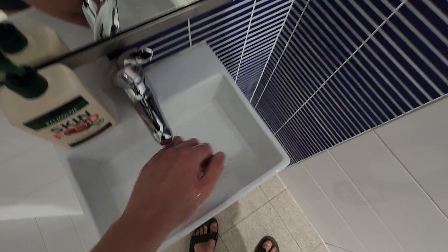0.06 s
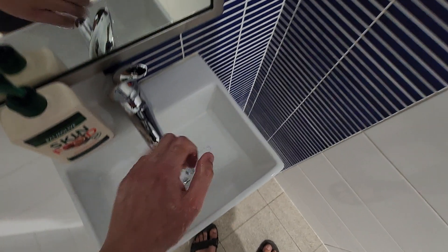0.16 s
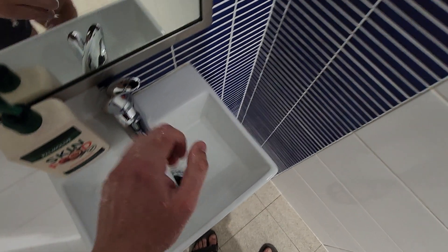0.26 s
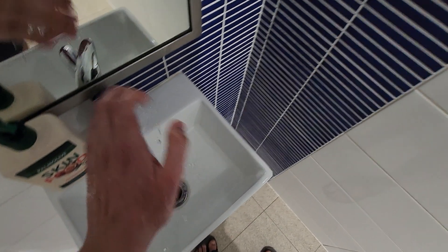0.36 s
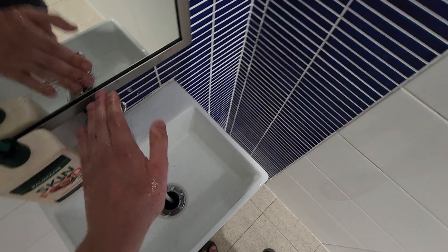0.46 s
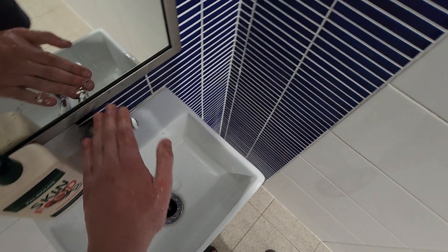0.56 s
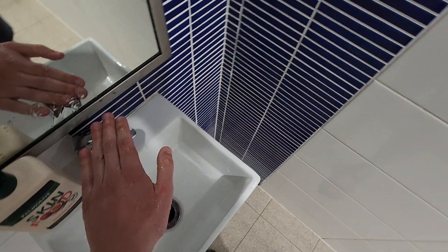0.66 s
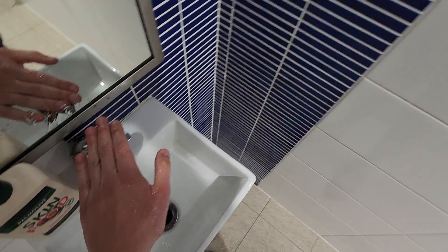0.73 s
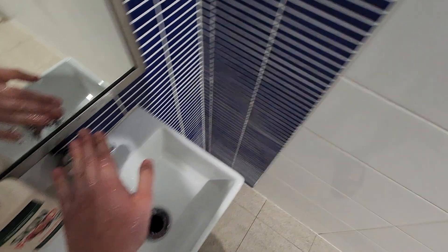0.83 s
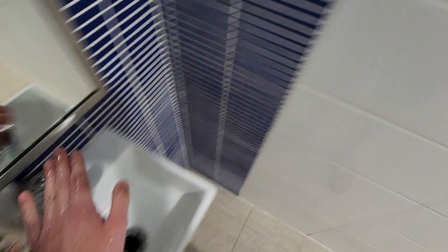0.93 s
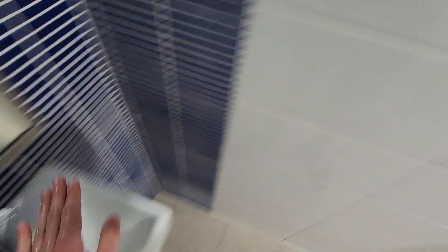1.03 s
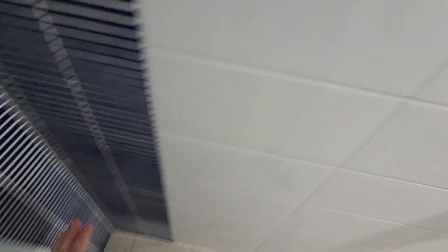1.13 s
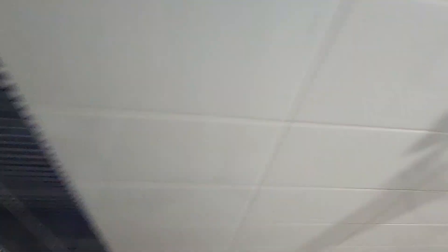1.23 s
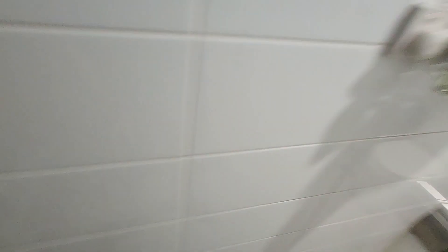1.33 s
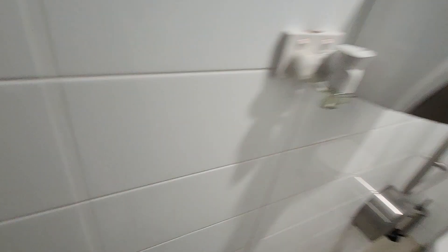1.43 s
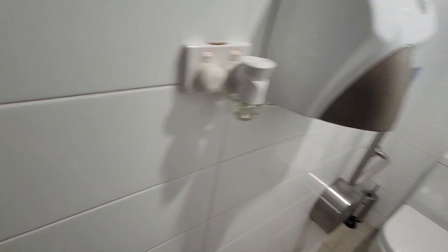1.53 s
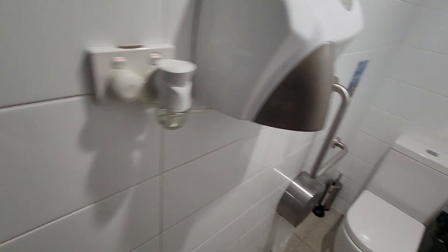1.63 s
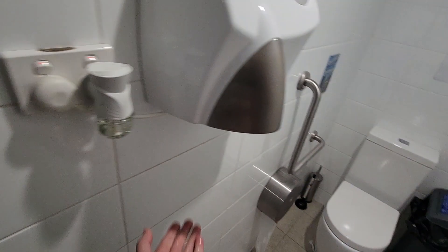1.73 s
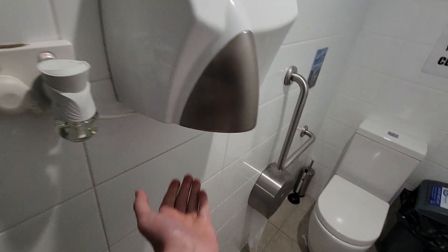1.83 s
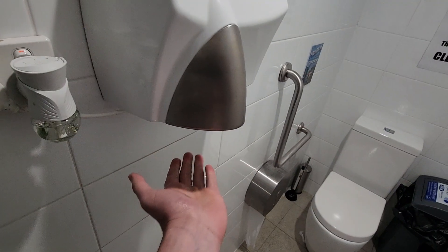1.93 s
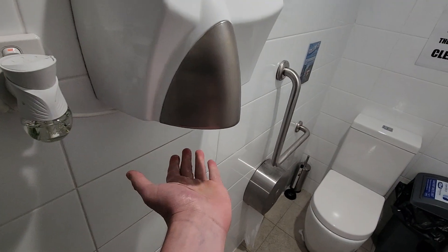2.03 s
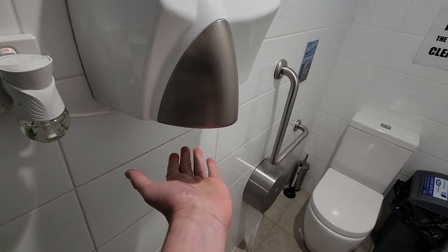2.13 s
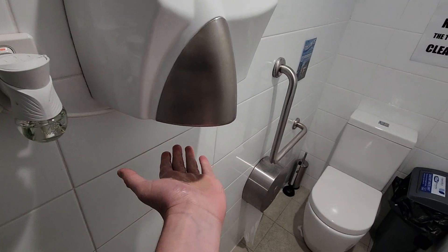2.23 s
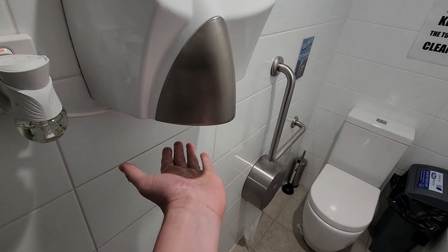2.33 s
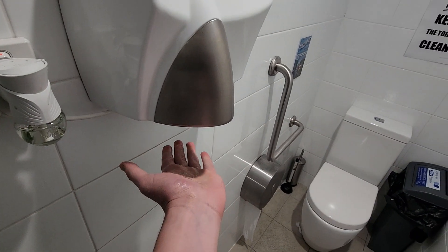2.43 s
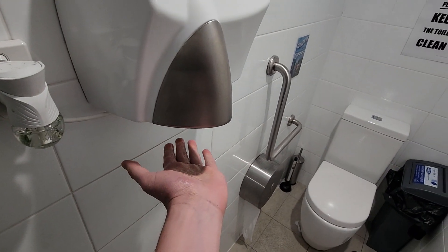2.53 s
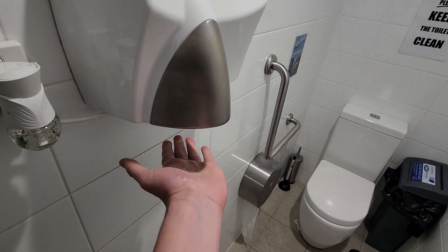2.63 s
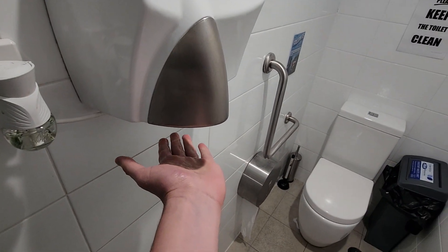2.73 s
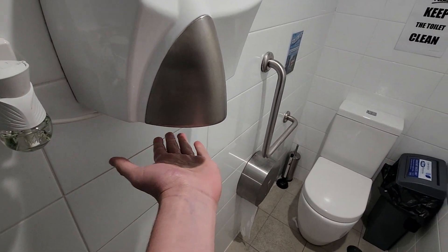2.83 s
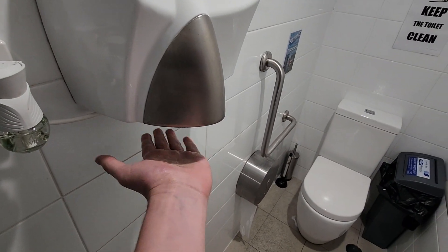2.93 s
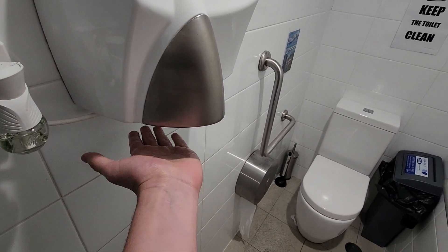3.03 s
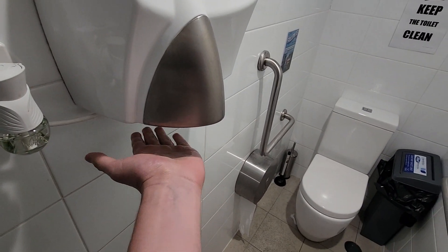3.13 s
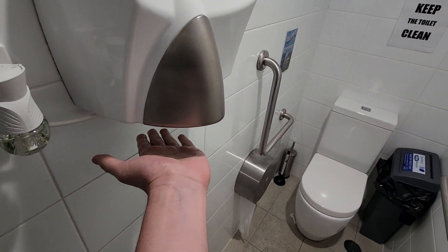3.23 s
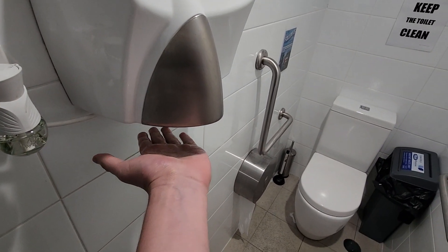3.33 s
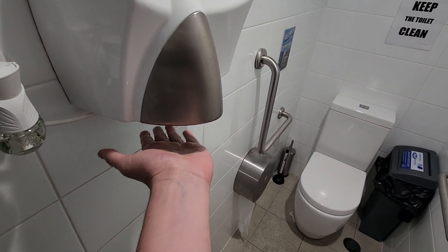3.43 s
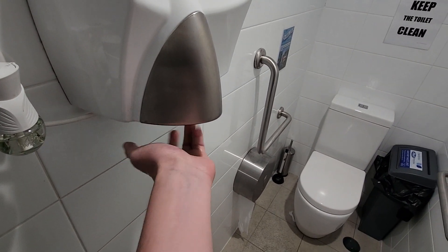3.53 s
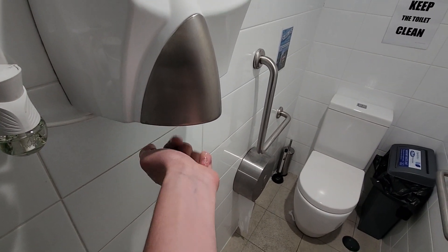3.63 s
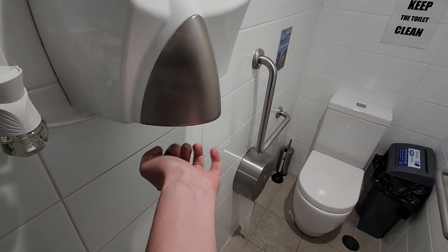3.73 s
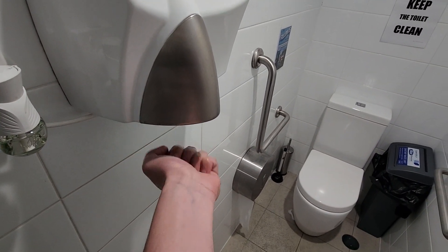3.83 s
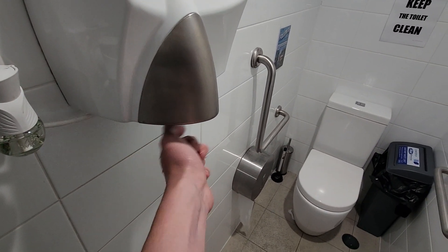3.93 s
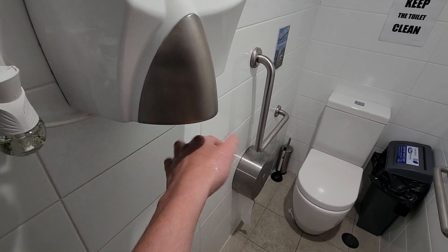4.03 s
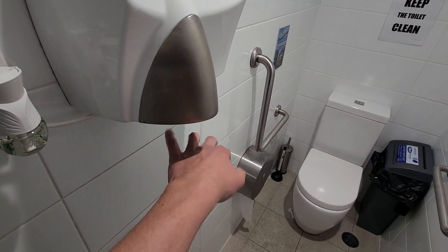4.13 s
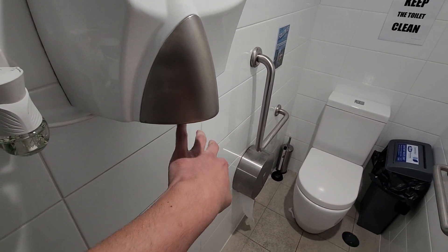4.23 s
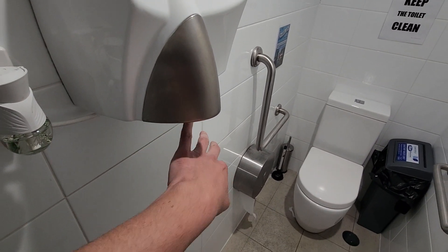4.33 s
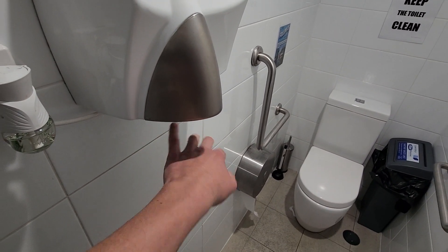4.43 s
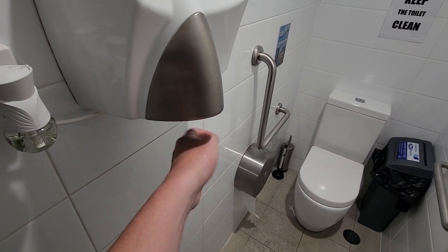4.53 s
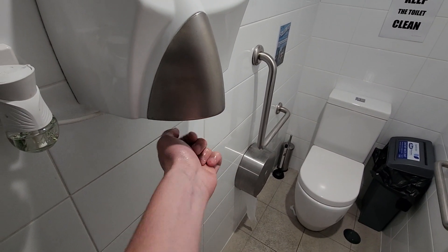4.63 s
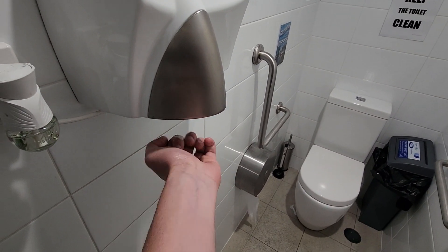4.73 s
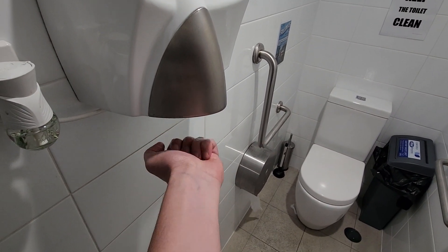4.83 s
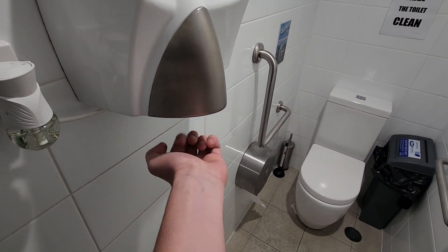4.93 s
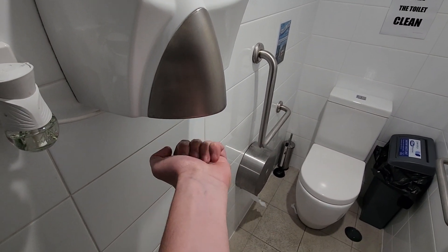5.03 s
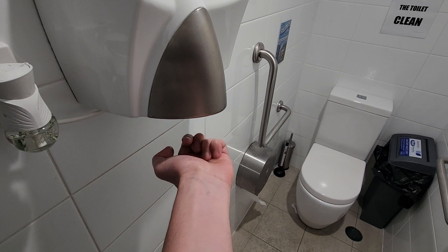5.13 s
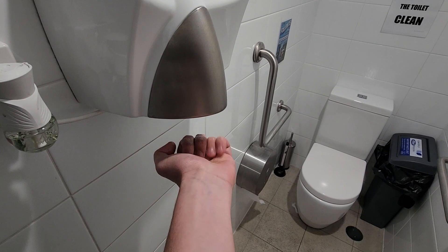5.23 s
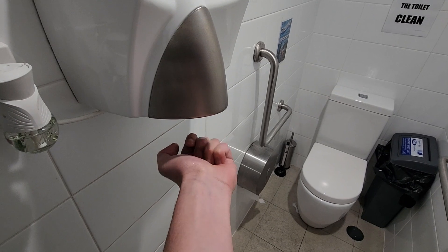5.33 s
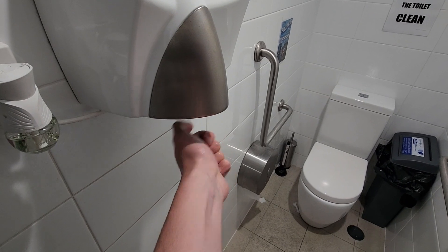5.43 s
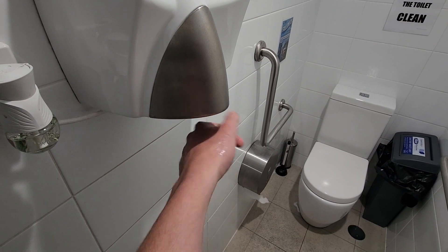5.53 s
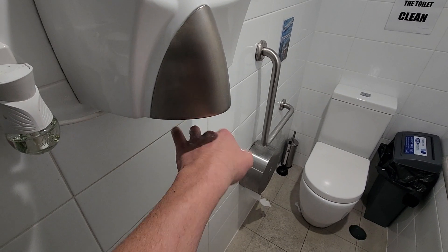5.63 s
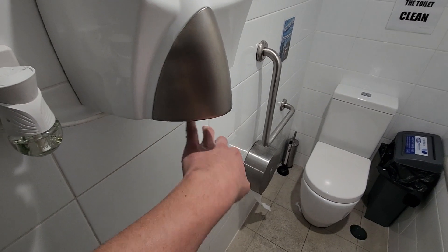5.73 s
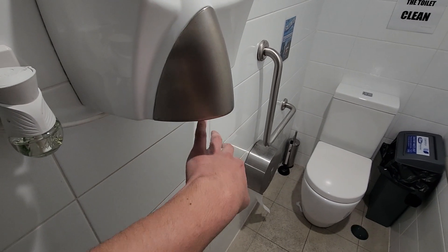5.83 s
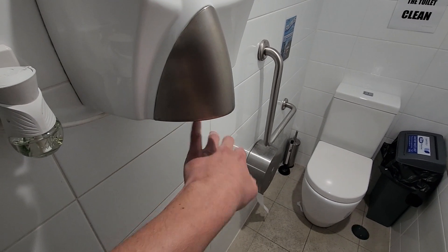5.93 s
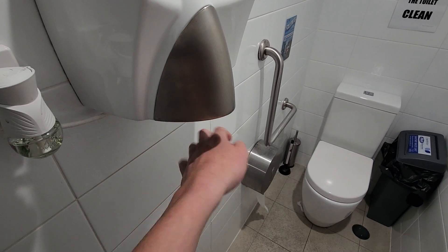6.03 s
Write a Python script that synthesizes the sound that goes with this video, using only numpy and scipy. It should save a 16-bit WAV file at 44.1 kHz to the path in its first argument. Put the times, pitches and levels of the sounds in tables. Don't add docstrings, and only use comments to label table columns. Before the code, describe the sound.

A small, hard tiled toilet room heard close up in stereo. From 0 to 1 s a tap splashes into a basin, fullest near 0.2 s, then throttled: sharp drops patter, the valve sings and the pipe gurgles in short bursts, with soft low thuds, until the water stops. From 1 to 2 s a few drops tick and rubber soles scuff and drag on tile, settling with a step at 2 s. Ventilation rumbles low throughout, with a thin whine emerging; it is quiet from 2.3 s, with tiny ticks and a faint step near 3.1 s. At 3.15 s a relay snaps brightly, the motor jolts with a thump and a short rising whine, and within about half a second a loud rush of air fills the room. The boomy, hissing roar over a low motor hum continues to about 6.1 s, dipping slightly near 3.85 and 4.9 s and swelling at the end as a hand moves.

```python
import sys
import numpy as np
from scipy import signal
from scipy.fft import rfft, irfft, next_fast_len
from scipy.io import wavfile
from scipy.ndimage import uniform_filter1d, map_coordinates

SR = 44100
rng = np.random.default_rng(int(sys.argv[2]) if len(sys.argv) > 2 else 0)


def wrap_up_sound(samples):
    columns = np.atleast_2d(samples).T
    tamed = np.clip(columns, -1, 1)
    steps = np.round(tamed * 32767).astype(np.int16)
    wavfile.write(sys.argv[1], SR, steps)


def gain_from_db(level_db):
    decades = np.asarray(level_db, float) / 20
    return 10 ** decades


N = 268128
TIME = np.arange(N) / SR
SIZE = next_fast_len(N + SR // 2)
HZ = np.maximum(np.arange(SIZE // 2 + 1) * SR / SIZE, 1)
RELAY_S = 3.1525
SINCE = np.maximum(TIME - RELAY_S, 0)
TAP_SHUT_S = 1.0


def rms_one(x):
    return x / np.sqrt(np.mean(x ** 2) + 1e-20)


def in_time(rows):
    s, *columns = np.transpose(rows)
    return [np.interp(TIME, s, c) for c in columns]


def in_pitch(rows):
    hz, *columns = np.transpose(rows)
    return [np.interp(np.log(HZ), np.log(hz), c) for c in columns]


def ramp(start_s, length_s):
    return np.clip((TIME - start_s) / length_s, 0, 1)


def bump(x, centre, half_width):
    return np.exp(-((x - centre) / half_width) ** 2)


def tone(hz):
    return np.sin(2 * np.pi * np.cumsum(hz) / SR)


def peaks(modes):
    return sum(gain_from_db(db) ** 2 / (1 + (2 * (HZ - hz) / width) ** 2) for hz, width, db in modes)


def below(hz):
    return 1 / (1 + (HZ / hz) ** 8)


def drift(rate):
    steps = rng.standard_normal(400)
    return rms_one(map_coordinates(steps, [np.minimum(TIME * rate + 2, 390)], order=3))


def ring(clicks, hz, t60):
    r = gain_from_db(-60 / (t60 * SR))
    w = 2 * np.pi * hz / SR
    return signal.lfilter([0, np.sin(w)], [1, -2 * r * np.cos(w), r * r], clicks)


def sides(db):
    return gain_from_db(np.multiply.outer([.5, -.5], np.atleast_1d(db)))


# (frequency [Hz], likeness [-1 to 1], left lead [rad])
DISTANT_PORTS = [(173, 0.98, 0), (300, 0.67, 0), (446, 0.67, 0), (620, 0.17, 0), (710, 0.43, 0),
                 (970, -0.034, 0), (1000, -0.56, 0), (1500, -0.059, 0.0033), (2080, 0.079, 0),
                 (16000, -0.084, 0)]


def field(gain, ports=DISTANT_PORTS, source=None):
    if source is None:
        source = rng.standard_normal((2, N))
    left, other = rfft(source, SIZE)
    alike, lead = in_pitch(ports)
    alike = np.clip(alike, -1, 1)
    right = alike * np.exp(-1j * lead) * left + np.sqrt(1 - alike ** 2) * other
    return rms_one(irfft(gain * np.array([left, right]), SIZE)[:, :N])


def two_tone(gain, body, top, source=None):
    low = below(10000)
    return (body * field(gain * np.sqrt(low), source=source)
            + top * field(gain * np.sqrt(1 - low), source=source))


def evened(x, span_s):
    return x / np.sqrt(uniform_filter1d(np.mean(x ** 2, axis=0), int(span_s * SR)) + 0.24)


def tiles(x):
    lag = np.arange(SR // 2) / SR
    echoes = rng.standard_normal((2, len(lag))) * gain_from_db(-60 * lag / 0.25) * (lag > .003)
    echoes /= np.sqrt(np.sum(echoes ** 2, axis=1, keepdims=True))
    return x + gain_from_db(-7) * signal.fftconvolve(x, echoes, axes=1)[:, :N]


def ripple(t60, wet_db, top_hz):
    lag = np.arange(SR // 2) / SR
    echoes = rfft(rng.standard_normal(len(lag)) * gain_from_db(-60 * lag / t60), SIZE)
    mostly_mid = (1 + (HZ / top_hz) ** 2) * (1 + (2300 / HZ) ** 6)
    echoes /= np.sqrt(np.mean(np.abs(echoes) ** 2) * mostly_mid)
    return np.abs(1 + gain_from_db(wet_db) * echoes)


# (frequency [Hz], level [dB per Hz])
AIR_COLOUR = [(30, -55), (52, -18), (70, -21), (110, -16.5), (250, -11.5), (340, -14.5), (520, -15),
              (800, -17.5), (1100, -14.5), (1300, -17.5), (1900, -24), (2400, -21), (4000, -25.5),
              (16000, -31)]
# (frequency [Hz], width [Hz], level above the air [dB])
ROOM_MODES = [(75, 11, 9), (99, 9.2, -13), (140.5, 20, 13.5), (192, 16, 10.5), (238.5, 12, 12.5),
              (258.3, 15, 14), (293, 20, 11), (379.5, 10.6, 15), (411, 11.6, 13.5), (451, 12, 5),
              (658, 14, 2.5), (1342, 11, 2), (1654, 40, 1)]
# (frequency [Hz], width [Hz], level above the air [dB])
TILE_MODES = [(689, 10, 7.5), (740, 13, 11.5), (772, 14, 6), (793, 7, 6), (836, 10, 4), (881, 15, 11),
              (950, 43, 3), (1028, 15, 7), (1077, 18, 4), (1280, 8.9, 2), (1432, 12, 11), (1535, 27, 5),
              (2110, 19, 8), (2225, 17, 5)]
# (frequency [Hz], likeness [0 to 1], left lead [rad])
DRYER_PORTS = [(99, 0.94, .05), (216, 0.91, 0.4), (334, 0.6, 0.25), (414, 0.99, 0.053), (474, 0.7, 0.51),
               (623, 0.13, 1.4), (782, 0.99, 1.06), (796, 0.68, 0.62), (938, 0.6, 1.83), (1420, 0.47, 3.6),
               (1840, 0, 1.5), (2480, 0.36, 5.56), (3060, 0.19, 11), (16000, 0.06, 7.5)]
# (time [s], level on the drone [dB])
HAND = [
    (3.6, 1),
    (3.85, 0.4),
    (4.2, 1),
    (4.5, 0.9),
    (4.9, 0.1),
    (5.2, 1),
    (5.6, 1.5),
    (6.08, 2.4),
]


def dryer():
    hand_db, = in_time(HAND)
    gain = gain_from_db(in_pitch(AIR_COLOUR)[0]) * np.sqrt(1 + peaks(ROOM_MODES + TILE_MODES))
    fine = gain * ripple(t60=0.47, wet_db=-4.5, top_hz=3500)
    low, high = below(520), 1 - below(1900)
    gust = drift(3.55)
    drone_db, roar_db, hiss_db = -19, -19, -20
    drone_swing = hand_db + .5 * drift(9)
    roar_swing = 0.38 * hand_db + 0.23 * gust + 0.28 * drift(23)
    hiss_swing = 0.05 * hand_db + 0.47 * gust + 0.18 * drift(22.07)
    drone = gain_from_db(drone_db + drone_swing) * field(gain * np.sqrt(low - below(53)), DRYER_PORTS)
    roar = gain_from_db(roar_db + roar_swing) * field(fine * np.sqrt(1 - low - high), DRYER_PORTS)
    hiss = gain_from_db(hiss_db + hiss_swing) * field(fine * np.sqrt(high), DRYER_PORTS)
    air = 1 - np.exp(-(SINCE / .2) ** 1.27)
    gulp = bump(SINCE, 0.058, 0.055) * (SINCE > 0)
    drone *= air ** 2.06 + gain_from_db(-35.5 - drone_db) * gulp
    roar *= air ** 2.28 + gain_from_db(-43.5 - roar_db) * gulp
    return drone + roar + air ** 2.8 * hiss


# (frequency [Hz], width [Hz], level [dB])
CASING = [(1090, 80, -3), (1600, 32, 5), (2210, 89, 3), (2520, 110, 3)]


def motor():
    speed = 1 - np.exp(-SINCE / .17)
    shaft_hz = 136.5 * speed + 1.078 * SINCE
    rotor_db = -23.5 + 5 * bump(shaft_hz, 126, 6.2)
    rotor = gain_from_db(rotor_db) * np.clip((SINCE - 0.28) / 0.14, 0, 1) * tone(shaft_hz)
    strain_db = -23.5 - 60 * np.maximum(SINCE - 0.3, 0) / 1.0
    strain = speed ** 3.5 * gain_from_db(strain_db + drift(30)) * field(np.sqrt(peaks(CASING)), DRYER_PORTS)
    blade_hz = 2610 - 1064 * np.exp(-SINCE / 0.091)
    blade_swell = gain_from_db(-40.5) * bump(SINCE, 0.16, 0.05) * (SINCE > 0)
    blades = blade_swell * gain_from_db(4.4 * np.array([drift(60), drift(60)])) * tone(blade_hz)
    shell_swell = gain_from_db(-39.5 + 2.0 * drift(50)) * bump(SINCE, .17, 0.045)
    shell = shell_swell * np.sin(2 * np.pi * 1605 * SINCE)
    return shell + rotor + strain + blades


# (frequency [Hz], level [dB per Hz])
RELAY_COLOUR = [(300, -14), (1500, -24), (2500, -10.5), (3300, -18), (4200, -13.5), (4900, -15),
                (5900, 1.5), (6800, -3.5), (8000, -9.5), (10800, -2), (12500, -4.5), (16000, -4)]


def relay():
    rise = 1 - np.exp(-SINCE / 0.0012)
    bounce = 1 + gain_from_db(-60 * SINCE / .03) + .6 * bump(SINCE, .015, .002)
    fall = gain_from_db(-22 - 60 * SINCE / 0.32 + drift(59.3))
    return rise * bounce * fall * field(gain_from_db(in_pitch(RELAY_COLOUR)[0]))


# (time [s], splash level [dB])
FLOW = [
    (0.0, -45.5),
    (0.2, -39.5),
    (0.335, -47.5),
    (0.54, -46.5),
    (0.67, -52.5),
    (0.71, -49.5),
    (0.798, -45.5),
    (0.838, -57),
    (1.0, -86),
]
# (frequency [Hz], level [dB per Hz])
SPLASH_COLOUR = [(250, -57), (600, -17), (1100, -7), (2000, -8.5), (4000, 0.5), (6200, -2), (16000, -1.5)]
# (time [s], half length [s], valve level [dB], pipe level [dB])
GURGLES = [(0.034, 0.03, -38, -68), (0.151, 0.019, -54, -35), (0.303, .02, -51, -66),
           (0.395, 0.014, -36, -40), (0.48, .012, -44, -54), (0.503, 0.014, -44, -41),
           (.55, 0.023, -54, -53), (0.594, 0.0074, -50, -40), (0.627, 0.019, -42.5, -45),
           (0.68, 0.015, -44, -39), (0.702, .015, -60, -44), (.735, 0.014, -39, -48),
           (0.769, 0.0099, -45, -42), (0.817, 0.016, -56, -44), (0.853, 0.013, -61, -51)]
# (frequency [Hz], width [Hz], level [dB])
VALVE_MODES = [(1222, 8.6, 7.5), (1350, 28, -5.5), (2060, 42, -7.5)]
# (frequency [Hz], width [Hz], level [dB])
PIPE_MODES = [(427.6, 13, 3), (506, 15, -6.5), (352, 17, -12)]


def spray():
    reach = SR + SR // 4
    sizes = gain_from_db(2.8 * np.minimum(rng.exponential(1, (2, N)), 4)) * rng.choice([-1, 1], (2, N))
    per_second = 900 * gain_from_db(6 * drift(30))
    born = (rng.random((2, N)) < per_second / SR) * (TIME < TAP_SHUT_S)
    dealt = rng.integers(0, 14, N)
    rings = 0
    for k, hz in enumerate(np.geomspace(1900, 15000, 14)):
        clicks = (sizes * born * (dealt == k))[:, :reach] + 1e-18
        rings = rings + ring(clicks, hz, 30 / hz)
    return 0.64 * rng.standard_normal((2, reach)) + 0.48 * rms_one(rings)


def tap():
    splash_db, = in_time(FLOW)
    wet = gain_from_db(splash_db - 4 + 0.89 * drift(38.0))
    mist_db = 4 - 15 * np.maximum(TIME - 0.31, 0)
    splash = two_tone(gain_from_db(in_pitch(SPLASH_COLOUR)[0]), wet, wet * gain_from_db(mist_db), spray())
    s, half, valve_db, pipe_db = np.transpose(GURGLES)
    swells = bump(TIME, s[:, None], half[:, None])
    song = np.clip((.92 - TIME) / 0.13, 0, 1) * np.clip((TIME - .3) / 0.069, .3, 1)
    closing = np.clip((TIME - .34) / .04, .2, 1)
    basin_ports = [(400, 0.47, .8), (1230, 0.77, 0.31), (2500, .2, 0)]   # (Hz, likeness, left lead rad)
    valve_swell = closing * (gain_from_db(valve_db) @ swells + gain_from_db(-56.5) * song) * gain_from_db(-2.0 + 2.0 * drift(25.5))
    valve = valve_swell * evened(field(np.sqrt(peaks(VALVE_MODES)), basin_ports), 0.058)
    pipe_swell = (gain_from_db(pipe_db) @ swells + gain_from_db(-47) * song) * gain_from_db(1.0 + 1.2 * drift(25.3))
    pipe = pipe_swell * evened(field(np.sqrt(peaks(PIPE_MODES)), basin_ports), 0.034)
    shutting = np.clip((TAP_SHUT_S - TIME) / 0.024, 0, 1)
    return tiles((splash + valve + pipe) * shutting)


# (time [s], peak level [dB], ring [Hz], top re peak [dB])
DROPS = [(0.039, -31, 14400, -7), (0.064, -16, 4110, -21), (0.13, -24.5, 6400, -21), (0.148, -16, 4600, -5),
         (0.1752, -23, 5400, -25), (0.2055, -28, 14900, -3), (0.226, -22, 8300, -26),
         (0.243, -21, 6000, -25), (0.25, -13.5, 6260, -4), (0.3004, -25, 2870, -19),
         (0.3452, -32, 13800, 4), (0.399, -22, 14500, -9), (0.4618, -26, 14300, -16),
         (0.5087, -29, 6050, -15), (0.571, -22, 7650, -9), (0.806, -29, 4600, -12),
         (0.9727, -49, 3810, -36), (0.9915, -44, 14500, 0), (1.0132, -38, 3120, -6),
         (1.039, -34, 12900, 11), (1.059, -42, 13800, -11), (1.0859, -47, 2990, -22),
         (1.1393, -45, 7000, -28), (1.1914, -25, 6450, -28), (1.481, -46, 5420, -40),
         (1.5895, -41, 5900, -27), (2.0063, -49, 2760, -20)]
# (time [s], peak level [dB], ring [Hz], top re peak [dB])
FAR_TICKS = [
    (2.339, -62, 13000, 3),
    (2.47, -63, 13000, 3),
    (2.6, -62, 13970, -3),
    (2.669, -58, 13000, 4),
]
# (time [s], peak level [dB], ring [Hz], top re peak [dB])
SMALL_TICKS = [(0.3, -36, 1960, -30), (.363, -34, 4600, -25), (.378, -32, 3800, -25),
               (.386, -38, 3000, -25), (.475, -33, 7750, -20), (.515, -38, 3050, -30),
               (.54, -37, 6000, -25), (.574, -33, 2750, -30), (.574, -34, 4750, -30),
               (.579, -31, 6000, -30), (.65, -42, 3070, -30), (.7731, -28, 8100, -10),
               (.775, -36, 4700, -30), (.809, -34.5, 4100, -25), (.812, -33, 3100, -30),
               (.812, -33, 6440, -25), (.845, -46, 3000, -30)]


def drops():
    length = SR // 10
    lag = np.arange(length) / SR
    out = np.zeros((2, N + SR))
    rows = DROPS + FAR_TICKS + SMALL_TICKS
    dull = signal.butter(4, 10600, fs=SR, output="sos")
    for (s, db, hz, top_db), grit in zip(rows, rng.standard_normal((len(rows), 2, length))):
        pan_db = 3 - min(s, 1.6) + 4 * grit[0, 0]
        grit[:, 0] = 4
        burst = np.diff(grit * gain_from_db(-60 * lag / 0.045), prepend=0)
        crack = 0.1 * signal.sosfilt(dull, ring(burst, 7500, 0.00066))
        crack_top = gain_from_db(top_db - 60 * lag / 0.016) * 0.64 * ring(burst, 10600, 0.00061)
        sound = crack + crack_top + 0.27 * gain_from_db(-5) * ring(burst, hz, 20.0 / hz)
        at = round(s * SR)
        out[:, at:at + length] += gain_from_db(db + 3) * sides(pan_db) * sound / np.abs(sound).max()
    return tiles(out[:, :N])


# (frequency [Hz], level [dB per Hz])
SOLE_COLOUR = [(300, 2), (900, 1.5), (1500, -0.5), (2400, 2.5), (4000, -1.5), (6000, 1), (16000, -3.5)]
# (start [s], attack [s], hold [s], slide level [dB], top re slide [dB])
SLIDES = [
    (1.085, .012, .02, -63, -11),
    (1.186, 0.0065, .006, -48, -14),
    (1.554, 0.03, 0.011, -51.5, -22),
    (1.669, 0.011, 0.016, -46.5, -5),
    (1.798, 0.061, 0.048, -49, -11),
    (1.996, .012, 0.029, -46.5, -14),
    (2.31, .04, .012, -66, -17),
    (3.106, 0.026, .002, -57, -2),
]


def scuffs():
    body = gain_from_db(-59.5) * ramp(1.4, 0.012) * np.clip((2 - TIME) / 0.24, 0, 1)
    top = gain_from_db(-13) * body
    for s, attack, hold, db, top_db in SLIDES:
        dying_s = np.maximum(TIME - s - attack - hold, 0)
        slide = ramp(s, attack) ** 2 * gain_from_db(db - 60 * dying_s / 0.32)
        body = body + slide
        top = top + gain_from_db(top_db) * slide
    grit = gain_from_db(2.5 + 1.0 * drift(45.0))
    squeal = np.interp(TIME - .02, TIME, top)
    return two_tone(gain_from_db(in_pitch(SOLE_COLOUR)[0]), grit * body, gain_from_db(2.5) * grit * squeal)


# (time [s], frequency [Hz], level [dB], 60 dB decay [s])
THUDS = [(0.08, 65.1, -20, 0.55), (0.141, 150, -21, 0.08), (0.551, 75, -26, 0.94), (0.62, 150, -32, .25),
         (0.9, 45.6, -27, 0.47), (2.0, 320, -37, 0.14), (2.005, 452, -38, .12), (2.58, 90, -30, .25),
         (2.98, 95.5, -34, .25), (1.88, 152, -34.5, 0.49), (2.2, 149, -30, 0.4), (3.159, 79.3, -19.5, 0.32),
         (3.163, 198, -26.5, 0.18), (3.169, 262, -37, 0.21)]


def thuds():
    out = np.zeros(N)
    for s, hz, db, t60 in THUDS:
        lag = np.maximum(TIME - s, 0)
        swell = 1 - np.exp(-lag * 6 / t60)
        out += gain_from_db(db - 60 * lag / t60) * swell * 2 * np.sin(2 * np.pi * hz * lag)
    return out


# (frequency [Hz], level [dB per Hz])
DUCT_COLOUR = [(25, -32), (36, -16), (60, -15), (100, -18.5), (250, -27), (500, -35), (900, -42.5),
               (1200, -45.5), (2500, -53.5), (4000, -56), (8000, -59.5), (9200, -71), (10800, -84),
               (12000, -69), (16000, -78)]
# (frequency [Hz], width [Hz], level above the air [dB])
DUCT_MODES = [(70, 25, 2), (96.4, 3.4, 13.5), (134, 5.9, 8.5), (144, 4, 14), (217, 19, 9), (428, 13, 11.5),
              (477, 14, 2), (683, 12, 4), (910, 14, 4)]
# (time [s], rumble change [dB])
PLACE = [
    (0, 3),
    (.4, 2),
    (1.0, -1.5),
    (1.5, 1.5),
    (1.75, -3),
    (2.1, 2.5),
    (2.4, -0.5),
    (2.8, -0.8),
    (3.14, 3.5),
]
# (frequency [Hz], level [dB])
HUM = [(43.75, -36.5), (100, -57)]
# (time [s], level [dB], left minus right [dB])
TURN = [
    (0.0, -67, 3),
    (0.4, -53, -5),
    (0.96, -51, -7),
    (1.14, -56, 13),
    (1.3, -54, -2),
    (1.44, -58, -16),
    (1.7, -45, 3),
    (1.9, -48, 12),
    (3.14, -45.5, 10.5),
]
# (frequency [Hz], level [dB], left minus right [dB], heard from [s])
WHISTLES = [(3160, -69, -8, 1.95), (3429, -82, -6, 1.5), (4043, -83, -8, 1.2), (4570, -85, -6, 1.5),
            (4840, -74, -9, 0.6), (7294, -86, 4, 2.2)]


def ventilation():
    gain = gain_from_db(in_pitch(DUCT_COLOUR)[0]) * np.sqrt(1 + peaks(DUCT_MODES))
    low = below(330)
    rumble_db = -38 + in_time(PLACE)[0] + 1.5 * drift(2.83)
    rumble = gain_from_db(rumble_db) * field(gain * np.sqrt(low - 0.66 * below(47)))
    hum = sum(gain_from_db(db + 1.5 + 2.8 * drift(3.97)) * np.sin(2 * np.pi * hz * TIME) for hz, db in HUM)
    corner = gain_from_db(-43.5) * ramp(1.32, 0.17) * evened(field(peaks([(91.6, 2, 0)])), 0.16)
    body = gain_from_db(-ramp(2.42, 0.27))
    top = gain_from_db(-7 * ramp(2.42, .4) - 24.0)
    hiss = gain_from_db(-48) * two_tone(gain * np.sqrt(1 - low), body, top)
    shudder = gain_from_db(-58) * field(np.sqrt(below(38) - below(24)))
    whine_db, pan_db = in_time(TURN)
    whine_db -= 12 * ramp(RELAY_S, .05)
    whine = gain_from_db(whine_db + 0.5) * sides(pan_db) * tone(705 + 0.88 * drift(5.2))
    for hz, db, pan_db, s in WHISTLES:
        phase = rng.uniform(0, 2 * np.pi, (2, 1))
        heard = ramp(s, 0.16) * gain_from_db(db + 2.5 + .5 * drift(3.0))
        whine += heard * sides(pan_db) * np.sin(2 * np.pi * hz * TIME + phase)
    return rumble + hum + corner + hiss + shudder + whine


def scene():
    near = dryer() + motor() + relay() + tap() + drops() + scuffs()
    return near + thuds() + ventilation()


def top_cut(x):
    return signal.sosfilt(signal.butter(12, 15850, fs=SR, output="sos"), x)


# (frequency [Hz], left level [dB], right level [dB])
MIC_PORTS = [(1500, 0.5, 0.5), (2500, -3, -0.24), (4320, -3.5, 1.5), (6540, -2, 2), (8050, 4.5, -10),
             (9080, -7.5, -34), (9620, -13, -36), (11470, -5.5, -12), (13800, 4.5, -8.5), (16000, -3, -24)]


def record(dry):
    echo = irfft(np.log(gain_from_db(np.array(in_pitch(MIC_PORTS)))), SIZE)
    echo[:, 1:SIZE // 2] *= 2
    echo[:, SIZE // 2 + 1:] = 0
    ports = irfft(rfft(dry, SIZE) * np.exp(rfft(echo)), SIZE)[:, :N]
    rounded = 2.2 * np.tanh(ports / 2.2)
    return top_cut(rounded)


dry = scene()
out = record(dry)
wrap_up_sound(out)
```